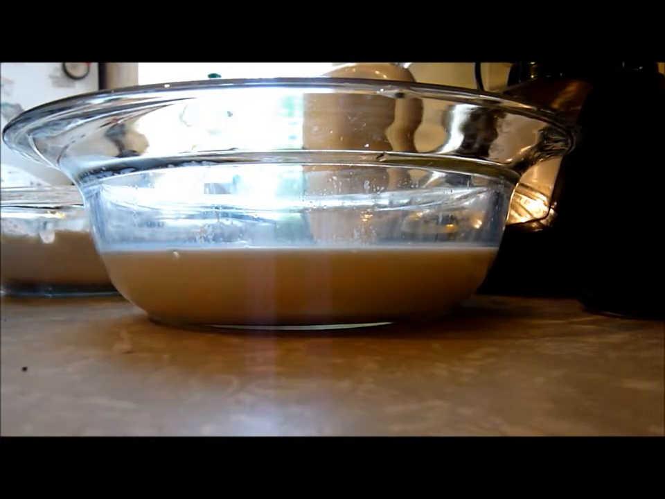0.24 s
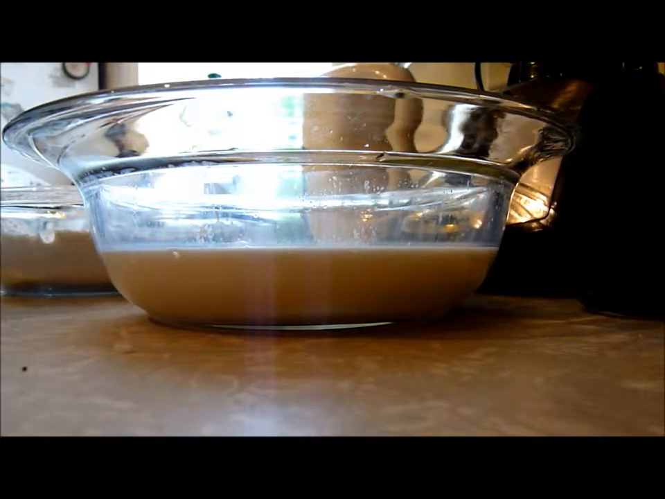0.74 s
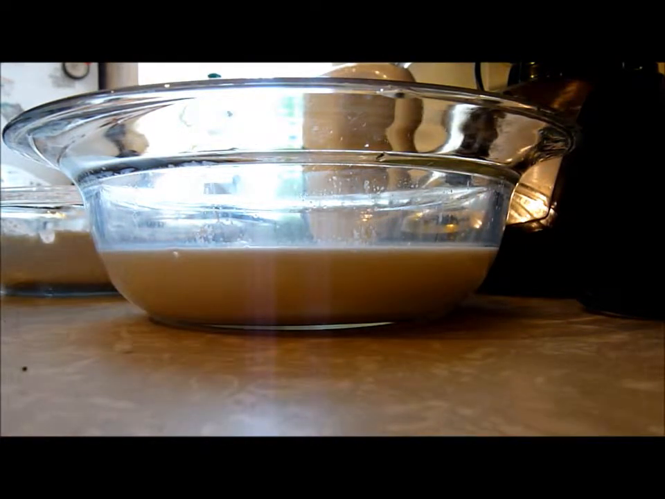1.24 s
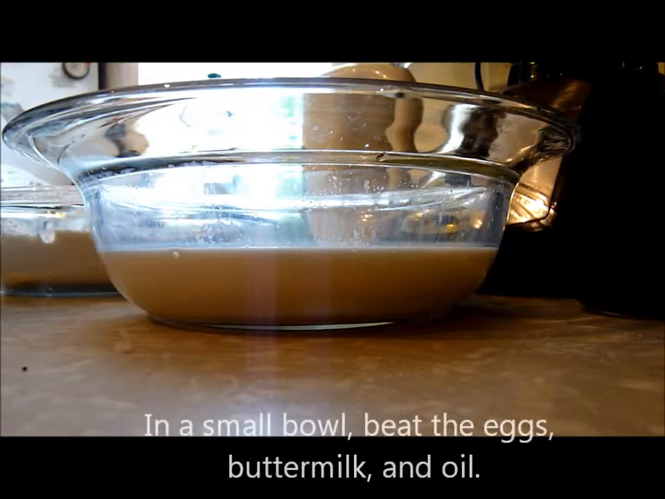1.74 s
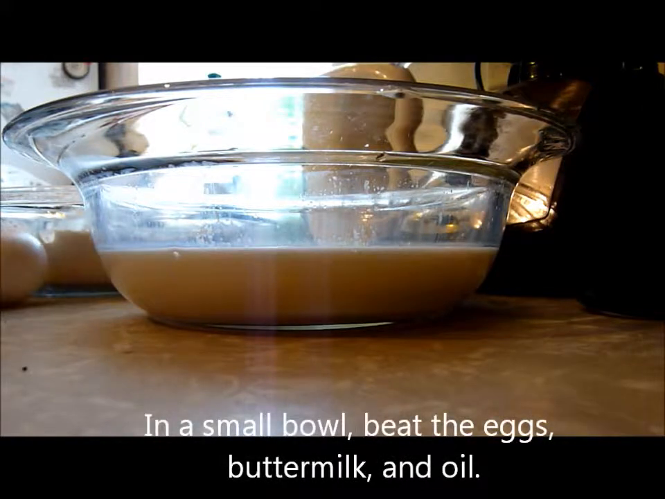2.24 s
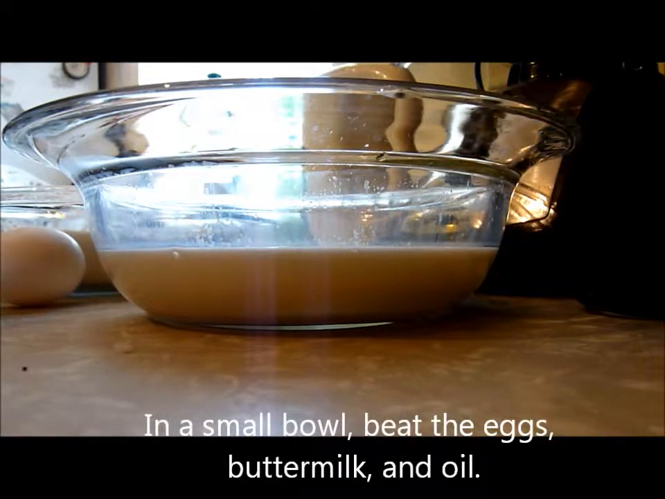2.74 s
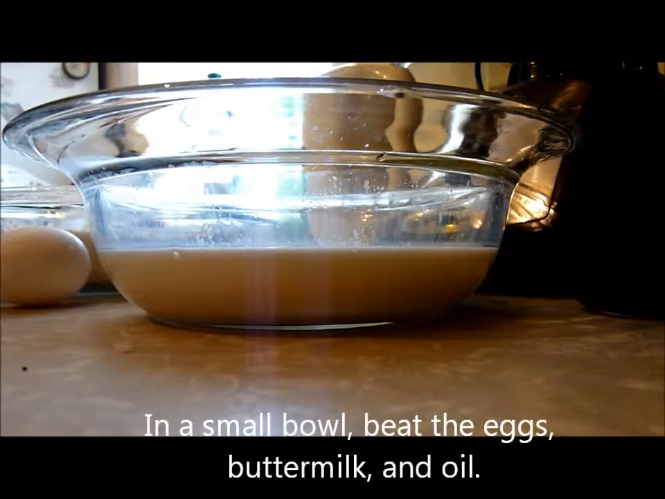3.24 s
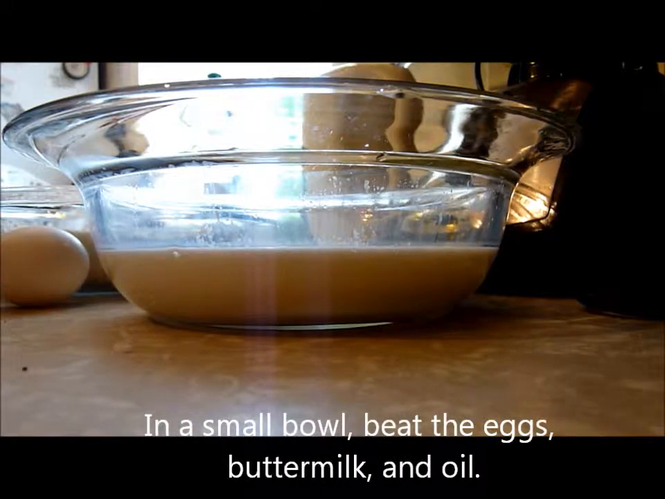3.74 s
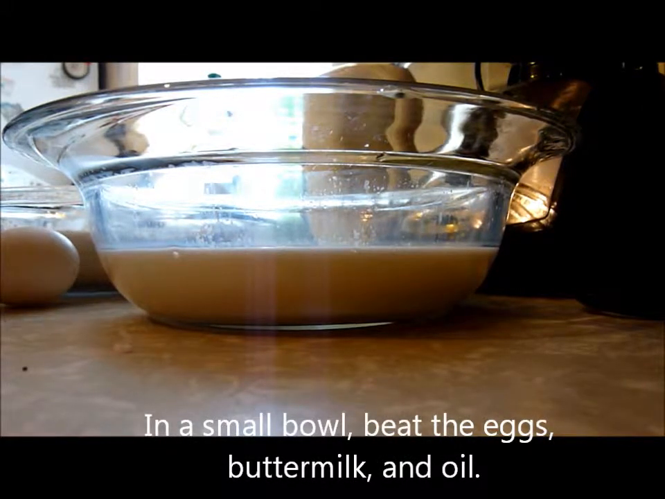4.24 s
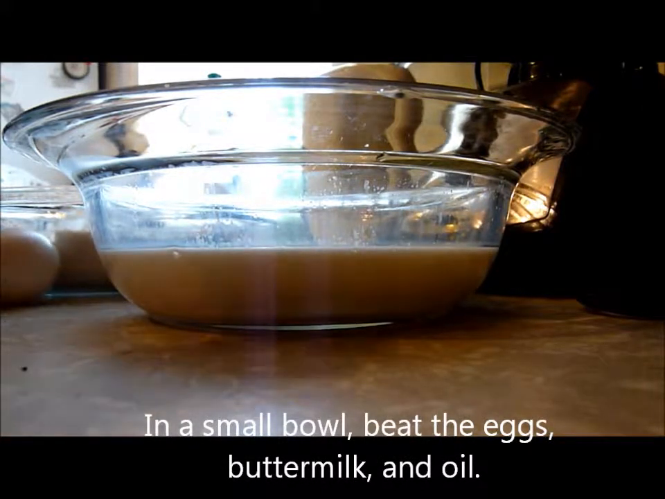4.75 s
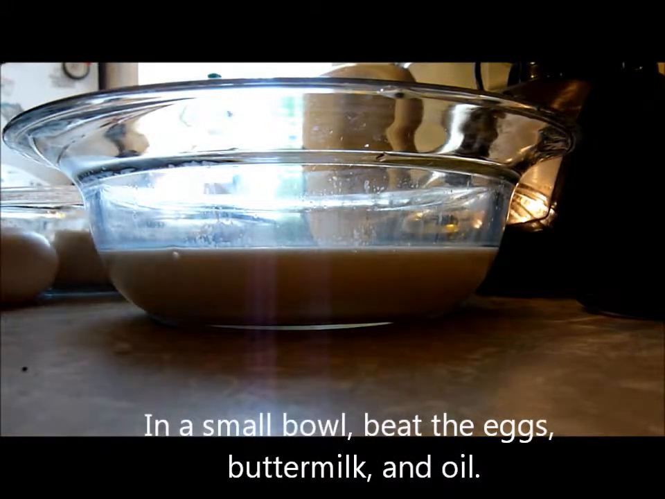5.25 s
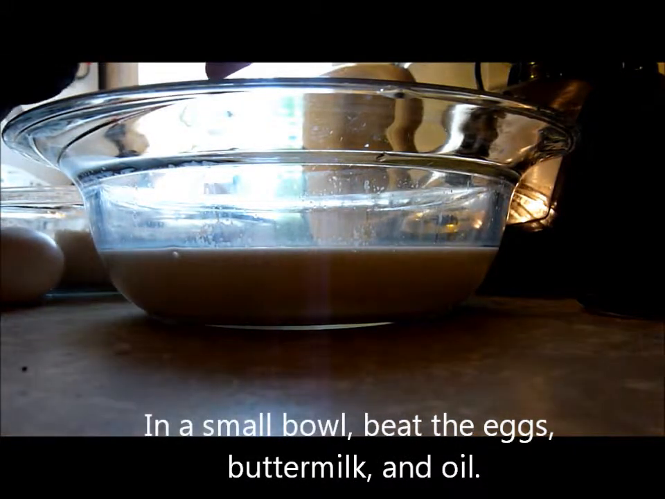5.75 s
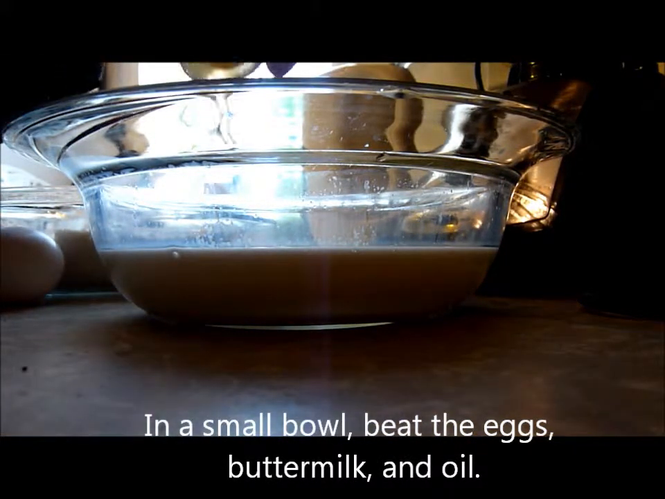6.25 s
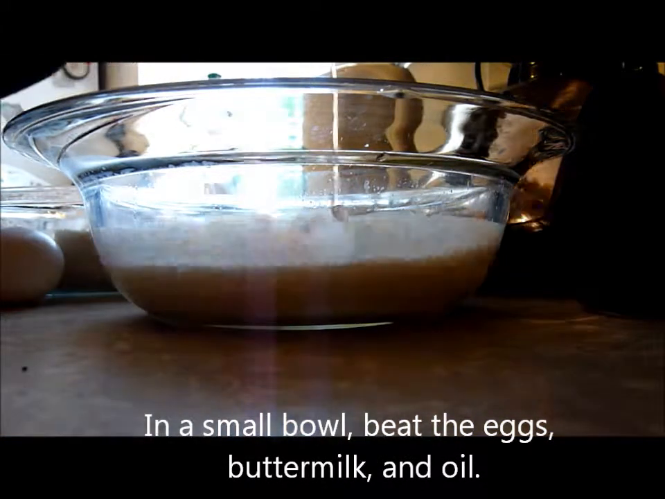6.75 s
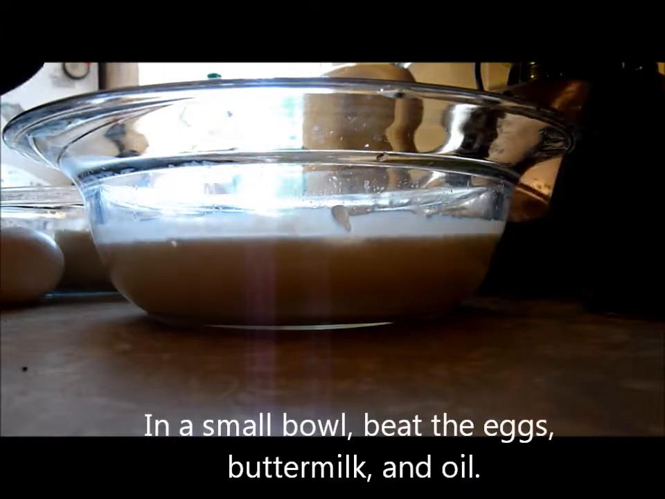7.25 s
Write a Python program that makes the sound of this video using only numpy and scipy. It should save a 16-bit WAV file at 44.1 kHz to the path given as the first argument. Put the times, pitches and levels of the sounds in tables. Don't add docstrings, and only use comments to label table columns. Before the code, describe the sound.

A glass bowl clinks and slides onto a kitchen counter, then an egg is rapped five times, cracked open, and its yolk plops into liquid.

```python
import sys
import numpy as np
from scipy import signal
from scipy.fft import rfft, irfft
from scipy.io import wavfile
from scipy.ndimage import uniform_filter1d

SR = 44100
rng = np.random.default_rng(int(sys.argv[2]) if len(sys.argv) > 2 else 0)


def persist_wave(psi):
    counts = np.round(np.clip(psi, -1, 1) * 32767).astype(np.int16)
    wavfile.write(sys.argv[1], SR, np.atleast_2d(counts).T)


def natural_amplitude(level_db):
    exponent = np.asarray(level_db, float) / 20
    return 10 ** exponent


N = 331191
T = np.arange(N) / SR
HZ = np.fft.rfftfreq(N, 1 / SR) + 1


def colour(x, points):
    hz, db = np.transpose(points)
    gain_db = np.interp(np.log(HZ), np.log(hz), db)
    return irfft(rfft(x) * natural_amplitude(gain_db), N)


def band(x, lo_hz, hi_hz):
    return signal.sosfilt(signal.butter(2, [lo_hz, hi_hz], "band", fs=SR, output="sos"), x)


def unit(x):
    return x / np.sqrt(np.mean(x ** 2))


def peak(x, db):
    return x * natural_amplitude(db) / np.abs(x).max()


def add(out, s, x):
    i = int(s * SR)
    out[..., i:i + x.shape[-1]] += x[..., :N - i]


def curve(rows):
    return np.interp(T, *np.transpose(rows))


def walk(rate):
    k = int(SR / rate)
    held = np.repeat(rng.standard_normal(N // k + 1), k)
    return uniform_filter1d(held, k)[:N] * 1.2


def ring(x, hz, t60):
    pole = np.exp(2j * np.pi * hz / SR - np.log(1000) / (t60 * SR))
    return signal.lfilter([1, -1], [1, -pole], x).real * SR / (2 * np.pi * hz)


def grit(t60, scatter_db, rise=0.00083, snap=0., size=8192):
    t = np.arange(size) / SR
    chance = rng.standard_normal((2, size))
    uneven = natural_amplitude(scatter_db * np.repeat(chance[1], 16)[:size])
    spray = chance[0] * uneven * (1 - np.exp(-t / rise)) * 1000 ** (-t / t60)
    return spray + snap * np.exp(-t / .00005) * np.sign(chance[0, 0])


# (pitch_hz, side_minus_mid_db)
APART = [(60, -19), (500, -17.5), (1400, -8), (2500, 0), (5000, -0.5), (10000, 2), (15000, 5.5)]


def wide(mid, side):
    side = colour(side, APART)
    return np.array([mid + side, mid - side])


# (pitch_hz, level_db)
RUMBLE = [(15, -44.5), (25, 0.5), (75, -6.5), (125, 8.5), (200, -5), (310, 4.5), (461, -2.5), (600, 4.5),
          (844, -4), (1060, 0.5), (1210, -13), (1900, -29), (2300, -71.5), (2990, -36), (5060, -120)]
# (pitch_hz, level_db)
HISS = [(1500, 4), (3500, -3), (6000, -20.5), (10000, 4), (14000, 6.5), (16500, -14)]


def kitchen():
    rumble = unit(colour(rng.standard_normal((2, N)), RUMBLE)) * natural_amplitude(-70.5)
    hiss = unit(colour(rng.standard_normal((2, N)), [(300, -40)] + HISS)) * natural_amplitude(-82)
    return wide(*rumble) + hiss


# (pitch_hz, t60_s, level_db)
ROOM = [(121.3, 0.29, -2), (219, 0.1, -19.5), (472, 0.24, -10.5), (977, 0.37, -17.5), (2000, 0.38, -20),
        (4000, 0.37, -22.5), (7500, 0.3, -24), (12760, 0.29, -23.5)]


def room(x):
    t, tail = np.arange(SR // 2) / SR, 0
    for hz, t60, db in ROOM:
        noise = band(rng.standard_normal((2, len(t))), hz / 1.41, hz * 1.388)
        tail = tail + natural_amplitude(db - 24.0) * noise * 1000 ** (-t / t60)
    tail = tail * (1 - np.exp(-t / 0.0011))
    return wide(*signal.fftconvolve(x[None], tail, axes=1)[:, :N])


# (time_s, level_db)
SLEEVES = [(0.0, -84), (.25, -67.5), (.6, -60), (.73, -78.5), (1.0, -75), (1.2, -104), (1.72, -69.5),
           (2.3, -75), (2.59, -69), (2.8, -69.5), (3.3, -72), (3.55, -102.5), (4.45, -86), (4.7, -70),
           (5.2, -70.5), (5.7, -72.5), (6.6, -71), (7.51, -73)]
# (time_s, level_db)
SLIDE = [(1.2, -83), (1.24, -89.5), (1.32, -54.5), (1.36, -64.5), (1.4, -46.5), (1.48, -46.5), (1.55, -49),
         (1.63, -63), (1.75, -101)]


def hands():
    busy_db, slide = curve(SLEEVES), natural_amplitude(curve(SLIDE))
    grains = rng.standard_normal((6, N)) * natural_amplitude(1.6 * walk(90))
    rub = natural_amplitude(-82 + 0.13 * (busy_db + 69.0)) + slide * natural_amplitude(-1.5)
    brightness = natural_amplitude(-81 + 0.45 * (busy_db + 70.5)) + slide * natural_amplitude(-1)
    dull = natural_amplitude(busy_db) * unit(band(grains[:2], 180, 1080))
    dull = dull + slide * unit(band(grains[:2], 270, 720))
    dull = dull + rub * unit(band(grains[4:], 1100, 3420))
    bright = brightness * unit(band(grains[2:4], 1100, 8600))
    swells_db = 3.5 * walk(25)
    drone = natural_amplitude(-80 + swells_db) * unit(ring(rng.standard_normal(N), 299.8, 1.0))
    return wide(dull[0] + bright[0] + drone, dull[1] + bright[1])


# (start_s, level_db, t60_s, low_edge_hz, high_edge_hz)
SCUFFS = [(0.958, -39.5, 0.13, 313, 2000), (1.734, -49.5, 0.023, 583, 1600), (2.607, -53, 0.26, 433, 2540),
          (2.635, -50, 0.12, 496, 1220), (2.707, -49, 0.11, 306, 2000), (2.79, -63, 1, 1500, 14000),
          (0.0, -60.5, 0.3, 5000, 15000), (7.12, -56, 0.18, 1830, 2470), (7.22, -60, 0.11, 1520, 2320),
          (2.04, -62.5, 0.36, 1490, 7960), (3.204, -57, 0.2, 407, 4920), (5.029, -55, 0.38, 148, 790),
          (5.333, -53, 0.073, 400, 1430), (5.602, -55.5, 0.11, 596, 2000), (6.101, -45, 0.18, 1700, 9000),
          (6.36, -54, 0.87, 1700, 8950), (6.529, -45, 0.086, 2550, 4000), (6.544, -43.5, 0.041, 101, 880),
          (6.576, -61, 0.13, 2900, 3580), (6.629, -62, 0.19, 2920, 3480), (7.424, -50, 0.62, 1460, 2400),
          (7.445, -68, 0.37, 2840, 4000), (7.448, -51.5, 0.33, 2520, 12600)]


def scuffs():
    out = np.zeros((2, N))
    for s, db, t60, lo_hz, hi_hz in SCUFFS:
        swell_s = 0.092 * t60 * t60
        add(out[0], s, peak(band(grit(t60, 2.3, swell_s, size=16384), lo_hz, hi_hz), db))
    return out


# (start_s, worktop_ring_hz, level_db, t60_s)
BUMPS = [(1.314, 590, -46, 0.16), (1.146, 57.4, -66, 0.056), (1.649, 317, -55.5, 0.52),
         (1.779, 309, -54.5, 0.083), (1.965, 318, -53, 0.21), (2.201, 313.4, -58, 0.41),
         (2.4, 104, -55, 0.055), (0.469, 230, -57, 0.092), (2.397, 324, -33, 0.13),
         (2.397, 193.6, -45.5, 0.27), (2.45, 327, -56, 0.26), (2.547, 307, -52, 0.07),
         (2.61, 336, -51.5, 0.16), (2.644, 336, -42.5, 0.1), (2.731, 306, -53.5, 0.15),
         (4.691, 313, -58, 0.37)]


def bumps():
    out, t = np.zeros((2, N)), np.arange(16384) / SR
    for s, hz, db, t60 in BUMPS:
        clean = np.sin(2 * np.pi * hz * t) * (1 - np.exp(-t / (0.023 * t60))) * 1000 ** (-t / t60)
        rough = band(grit(0.8 * t60, 4.2, 0.0026, size=16384), hz / 1.42, hz * 1.6)
        add(out[0], s, peak(clean + peak(rough, -7.5), db))
    return out


# (start_s, bubble_hz, level_db, t60_s, pitch_rise_share)
BUBBLES = [(6.449, 160, -53, 0.028, 0.4), (6.533, 2290, -48, .03, -0.15), (6.531, 2440, -29, 0.0091, -0.11),
           (6.547, 410, -42, 0.053, 0.53), (6.556, 618, -37.5, 0.056, 0.049),
           (6.578, 1242, -41.5, 0.047, 0.079), (6.577, 194, -52.5, 0.14, 0.087),
           (6.59, 612, -51, 0.077, 0.1), (6.61, 1850, -61, 0.017, -0.39), (6.616, 2040, -46, 0.055, -0.1),
           (6.615, 2390, -37.5, 0.015, 0.3), (6.625, 616, -51.5, 0.036, -0.28), (6.63, 750, -59, 0.1, 0.13)]


def plop():
    out, t = np.zeros((2, N)), np.arange(8192) / SR
    for s, hz, db, t60, rise in BUBBLES:
        pitch_hz = hz * (1 + rise * np.minimum(t / t60, 1))
        phase = 2 * np.pi * np.cumsum(pitch_hz) / SR
        add(out[0], s, natural_amplitude(db) * np.sin(phase) * (1 - np.exp(-t / 0.00083)) * 1000 ** (-t / t60))
    return out


# (start_s, level_db, grit_minus_ring_db, scrape_minus_ring_db, extra_rim_pair_db)
CLINKS = [
    (1.143, -16, -4.5, -6, -3.5),
    (1.153, -28.5, -4, -35.5, 14),
    (1.365, -17.5, -3.5, -10.5, 3.5),
    (1.371, -34, -5.5, 6, -6.5),
    (1.4, -19.5, -21, -31, -2),
    (1.426, -25, -20.5, -6, 11),
    (1.494, -34.5, -28, 6.5, -13),
    (1.512, -36, 1, 4, 1),
    (1.535, -40, -24.5, -16, -1),
]
# (pitch_hz, held_db, standing_db, t60_s)
GLASS = [(750, -12, -15, .38), (780, -12, -10, .33), (1443, -9, -2, .5), (1462, 0, -6, .1),
         (1993, -10, -20, .24), (455, -26, -25, .33), (1710, -20, -14, .2), (2394, -24, -17, .12),
         (2870, -24, -20, .15), (3332, -17, -26, .24), (3630, -17, -26, .24), (5290, -23, -20, .15),
         (6261, -17, -24, .15)]
# (pitch_hz, held_db, standing_db, t60_s)
GRIP = [(633, -0.5, -5, 0.035), (847, -8.5, -6, 0.021), (1190, 3.5, 2.5, 0.031), (1302, -11, -11.5, 0.076),
        (4100, -29, -22, 0.069)]


def glass():
    rings, out, t = np.zeros((2, N)), np.zeros((2, N)), np.arange(16384) / SR
    contact_s = 0.012
    rise = 0.21 * contact_s
    swell = 1 - np.exp(-t / 0.0023)
    for s, db, grit_db, scrape_db, rim_db in CLINKS:
        held = s < 1.3
        for hz, held_db, standing_db, t60 in GLASS + GRIP:
            rim = 1400 < hz < 1500
            mode_db = (held_db if held else standing_db) + rim_db * rim
            damp = 0.33 if rim and not held else 1
            fade = 1000 ** (-t / (t60 * damp)) * swell
            add(rings[0], s - rise, natural_amplitude(db + mode_db - 9.5) * fade * np.sin(2 * np.pi * hz * t))
        scrape = band(band(grit(5 * contact_s, 1.1, rise), 705, 3700), 500, 4100)
        add(out[0], s - rise, peak(scrape, db + scrape_db))
        gritty = band(np.array([grit(6 * contact_s, 3.6, rise) for _ in "ms"]), 2200, 11500)
        add(out, s - rise, peak(gritty, db + grit_db + 1.5))
    return rings, out


# (time_s, low_edge_hz)
FLAKES = [(3.962, 3000), (6.327, 7000), (6.531, 8000), (6.654, 6500), (7.047, 8000), (7.123, 9000),
          (7.149, 5200), (7.179, 9000), (7.5, 9000)]


def edge(s, usual_hz):
    return max([hz for when, hz in FLAKES if abs(when - s) < .004] + [usual_hz])


# (start_s, thump_db, thump_hz, knock_minus_thump_db, knock_hz)
BLOWS = [
    (3.6014, -17.5, 290, -8.5, 650),
    (3.7875, -27.5, 338, 2.5, 1213),
    (3.963, -28.5, 496, -7, 1250),
    (4.1551, -33.5, 660, 2.5, 1214),
    (4.3504, -29.5, 510, -3, 800),
]
# (pitch_hz, t60_s)
COUNTER = [(148, .08), (194, .13), (300, .05), (393, .06), (493, .07), (670, .055), (791, .09)]
LANDINGS = [(-20.5, -16.5, -0.5, -6, -8, 2.5, -5), (-23, -22, -6, -12, -6, -9.5, -22),
            (-21, -11, -4.5, -28, -1.5, -9, -12.5), (-38, -8, -0.5, -7, 0, -14, -12),
            (-32, -23, -3, -12.5, -2.5, -3, 1.5)]
# (boom_db, lowest_mode_db, crunch_t60_s, contact_s)
BOOMS = [(-51, -12, 0.0036, 0.00033), (-33, -5, 0.014, 0.00028), (-36, -16, 0.011, 0.00046),
         (-37.5, -5, 0.01, 0.00051), (-35, -4, 0.034, 0.00041)]
# (pitch_hz, level_db, t60_s)
CABINET = [(48, -7, 0.68), (70, -4.5, 0.16), (103, -1, 0.092)]
# (start_s, level_db, t60_s, shard_ring_hz,
# shard_ring_db)
SPLINTERS = [(0.962, -49.5, 0.015, 3700, 35), (2.396, -51.5, 0.033, 5950, 8),
             (3.7876, -31.5, 0.012, 3160, 16.5), (3.601, -38, 0.042, 3760, -9),
             (3.788, -20, 0.0099, 5340, 8), (3.9615, -24, 0.018, 3420, 6),
             (4.1535, -23.5, 0.029, 6040, 4.5), (4.154, -29, 0.02, 4100, 18),
             (4.3504, -22.5, 0.033, 5260, -37)]


def snappiness(s):
    return 1 if s < 3.9 else 0.17


def counter():
    out = np.zeros((2, N))
    for blow, landing, under in zip(BLOWS, LANDINGS, BOOMS):
        s, db, hz, knock_db, knock_hz = blow
        boom_db, low_db, crunch_s, contact_s = under
        snap = snappiness(s)
        push = -np.exp(-.5 * (np.arange(16384) / SR / contact_s - 4) ** 2)
        thump = ring(push, hz, 0.016)
        thump = thump + sum(natural_amplitude(g) * ring(push, f, t) for (f, t), g in zip(COUNTER, landing))
        knock = ring(grit(crunch_s, 0.91, snap=-4.0 * snap), knock_hz, 0.021)
        knock = knock + 12 * band(grit(0.063, 0.5, snap=-8.0 * snap), 400, 1440)
        knock = band(knock, 580, 3400)
        add(out[0], s - 3 * contact_s, peak(thump, db + 5.0))
        boom = sum(natural_amplitude(g + low_db * (f < 60)) * ring(push, f, t) for f, g, t in CABINET)
        rock = np.roll(boom, 150)
        add(out, s - 3 * contact_s, np.array([peak(boom, boom_db), peak(rock, boom_db - 21.0)]))
        rattle = band(grit(0.13, 1.5, 0.011, size=16384), 137, 530)
        add(out[0], s, peak(rattle, db - 15.5))
        add(out[0], s, peak(knock, db + knock_db + 9.5))
    for s, db, t60, hz, ring_db in SPLINTERS:
        spray = np.array([grit(t60, 9.1, snap=6.5 * snappiness(s)), grit(t60, 2.73)])
        shards = spray + natural_amplitude(ring_db - 23.5) * ring(spray, hz, 0.0048)
        mid, side = band(shards, edge(s, 1100), 13000)
        side = 1.78 * side + np.tanh(28 / 17) * mid
        add(out, s, peak(np.array([mid, side]), db + 6.5))
        wash = band(np.array([grit(0.32, 0.71, 0.0022, size=16384) for _ in "ms"]), 4000, 11000)
        wash = wash + natural_amplitude(9.5 + np.clip(ring_db, -9, 5.0)) * band(wash, hz / 1.09, hz * 1.0)
        add(out, s, peak(wash, db - 24.5))
    return out


# (start_s, level_db, t60_s)
TICKS = [(5.024, -55, 0.087), (5.1853, -50, 0.04), (5.313, -45, 0.037), (5.342, -39, 0.025),
         (5.5, -55, 0.045), (5.523, -54, 0.039), (5.5837, -52, 0.04), (5.6, -46.5, 0.058),
         (5.6062, -36.5, 0.05), (5.657, -43.5, 0.053), (5.693, -47.5, 0.082), (5.705, -45, 0.047),
         (5.7787, -58, 0.022), (5.853, -33.5, 0.046), (5.9155, -50, 0.022), (5.928, -29.5, 0.047),
         (5.945, -32, 0.015), (5.9494, -38.5, 0.073), (5.9805, -24, 0.055), (6.0375, -22.5, 0.038),
         (6.305, -39, 0.047), (6.654, -45, 0.033), (6.721, -53, 0.029), (6.7366, -50.5, 0.064),
         (6.768, -52, 0.067), (7.024, -49, 0.018), (7.179, -42, 0.017), (7.2235, -47, 0.012),
         (7.212, -21.5, 0.016), (7.2377, -39.5, 0.014)]
# (start_s, level_db, hollow_ring_minus_click_db, hollow_hz)
CRACKS = [(6.088, -23, -19, 850), (6.104, -34, -9.5, 1690), (6.1442, -18.5, -12.5, 1446),
          (6.159, -26, -12, 1440), (6.198, -49, 11.5, 1470), (6.23, -49, -6, 1410),
          (6.2751, -26, -6.5, 1450), (6.328, -31.5, -18, 1390), (6.375, -38, -22, 1520),
          (6.3923, -26.5, -12.5, 1400), (6.436, -42, -6, 1523), (6.4587, -48, -16, 1540),
          (6.5306, -36, -6.5, 2020), (6.6143, -35, -10, 1800), (7.0016, -35, -20, 1710),
          (7.041, -59, 0, 2000), (7.047, -38, -28, 1820), (7.059, -47, -16, 1470), (7.123, -45, -18, 2170),
          (7.139, -41.5, -15, 2110), (7.1492, -30, -26.5, 2100), (7.219, -27.5, -18.5, 1600),
          (7.2454, -50.5, -4, 2040), (7.5004, -43, -19, 1900)]
# (time_s, left_minus_right_db)
SHELL_PAN = [(5.0, 5), (5.9, 1), (6.5, 3.5), (7.1, 1), (7.21, 1.5)]


def shell():
    out = np.zeros((2, N))
    empty_s = 6.9
    clicks = [(s, db, -38.5, 1600, t60) for s, db, t60 in TICKS]
    clicks += [(s, db, hollow_db, hz, 0.038 if s < empty_s else 0.021) for s, db, hollow_db, hz in CRACKS]
    for s, db, hollow_db, hz, t60 in clicks:
        pan_db = np.interp(s, *np.transpose(SHELL_PAN))
        mid_spray = grit(t60, 3.5, 0.00017, snap=7.8, size=4096)
        side_spray = grit(t60, 4.6, 0.00033, snap=1.4, size=4096)
        spray = np.array([mid_spray, side_spray])
        click = band(spray + natural_amplitude(-21.5) * ring(spray, 5300, 0.0011), edge(s, 4340), 14900)
        if s > empty_s:
            click = click + 0.75 * band(click, 12200, 16200)
        mid, side = click
        add(out, s, peak(np.array([mid, 0.76 * side + np.tanh(pan_db / 17) * mid]), db - 1.0))
        touch = grit(0.8 * t60, 3.9, snap=6.3, size=4096)
        hollow = ring(touch, hz, 0.031) + 0.016 * ring(touch, 0.21 * hz, 0.019)
        add(out[0], s, peak(hollow, db + hollow_db + 5.0))
    return out


def ports(source, lag_s, bass_lean, treble_lean, apart):
    mid, side = source
    late = lag_s / 2 * np.gradient(band(mid, 25, 3000)) * SR
    lean = treble_lean * band(mid, 1100, 8000) - bass_lean * band(mid, 25, 470)
    side = side - late + lean + apart * band(side, 9300, 15300)
    return np.array([mid + side, mid - side])


def scene():
    raps = counter() + bumps()
    rings, bowl = glass()
    egg = shell() + plop() + scuffs()
    near = ports(raps, .00006, .12, .35, .3)
    near = near + ports(bowl + rings, .00005, .03, .15, .1)
    near = near + ports(egg, .000005, .03, -.05, .1)
    sent = raps[0] + 0.32 * raps[1]
    sent = sent + natural_amplitude(9.0) * bowl.sum(0) + natural_amplitude(-0.5) * rings[0] + natural_amplitude(2.5) * egg.sum(0)
    return near + room(sent) + hands() + kitchen()


def roll_off(x):
    return signal.sosfilt(signal.butter(12, 16790, fs=SR, output="sos"), x)


# (pitch_hz, width_hz, level_db a pass)
NOTCHES = [(2620, 560, -19), (4620, 560, -16), (7920, 300, -9), (5900, 1800, 1)]


def record(dry):
    for hz, width, db in 2 * NOTCHES:
        dry = dry + (natural_amplitude(db) - 1) * signal.lfilter(*signal.iirpeak(hz, hz / width, SR), dry)
    top_db = np.interp(HZ, [13800, 15920, 15800, 16800], [-1.5, -2.0, -27.0, -52])
    mix = irfft(rfft(dry) * natural_amplitude(top_db), N)
    return roll_off(mix)


dry = scene()
out = record(dry)
persist_wave(out)
```